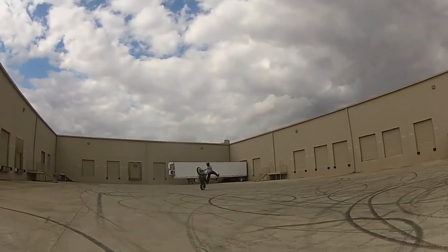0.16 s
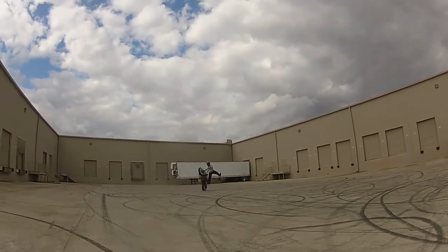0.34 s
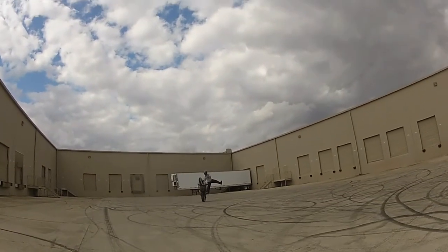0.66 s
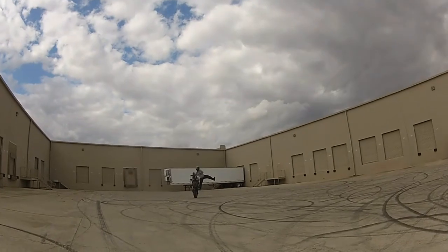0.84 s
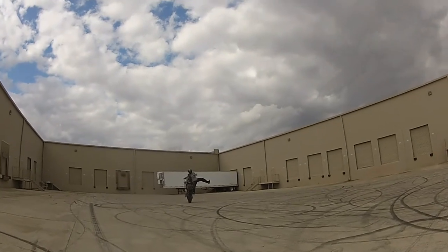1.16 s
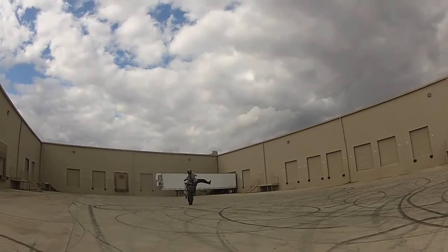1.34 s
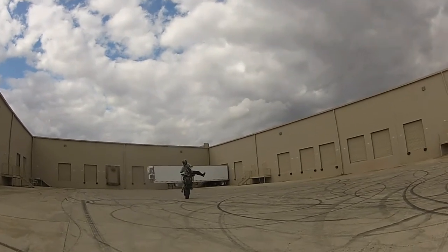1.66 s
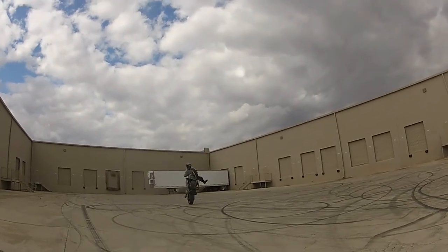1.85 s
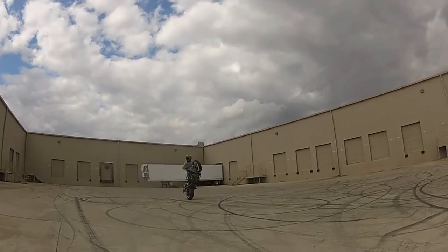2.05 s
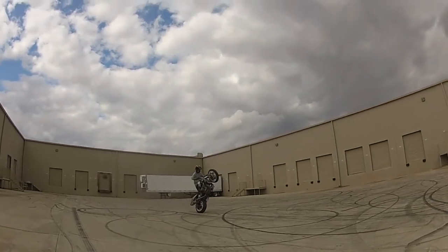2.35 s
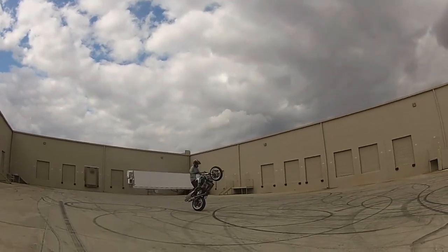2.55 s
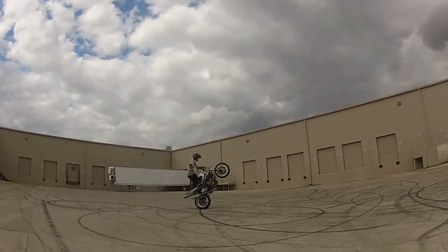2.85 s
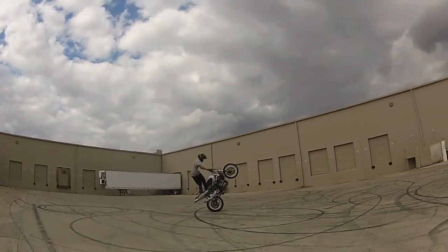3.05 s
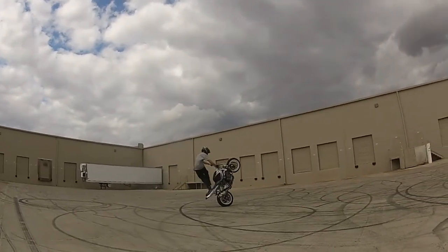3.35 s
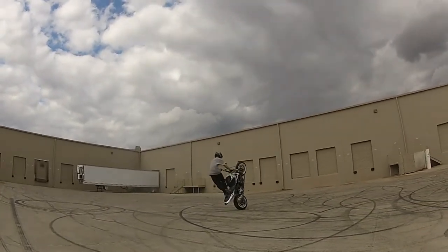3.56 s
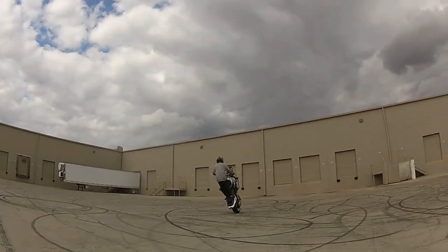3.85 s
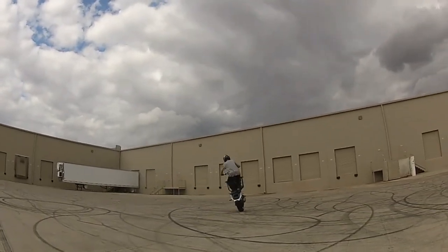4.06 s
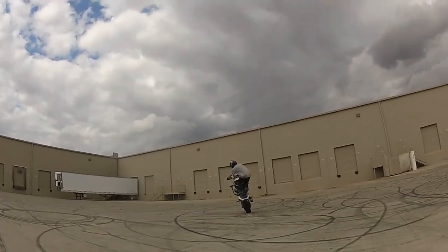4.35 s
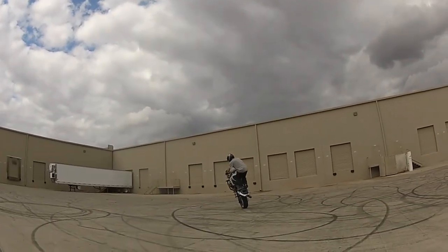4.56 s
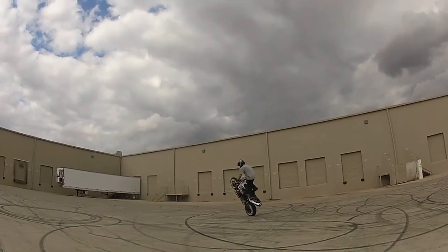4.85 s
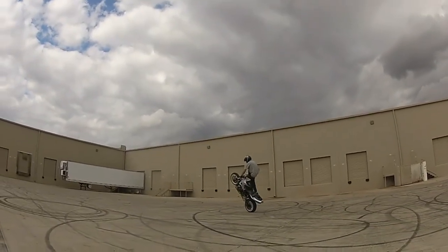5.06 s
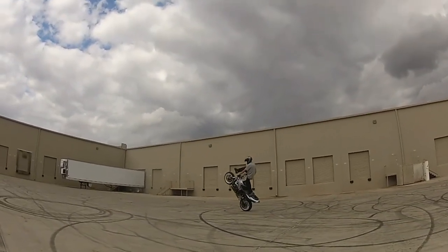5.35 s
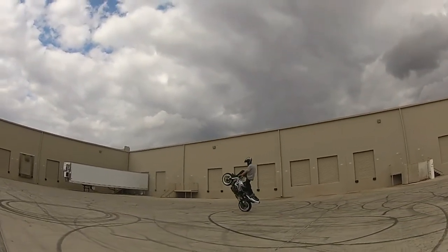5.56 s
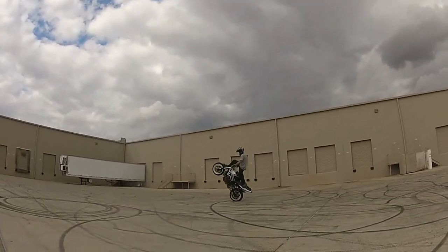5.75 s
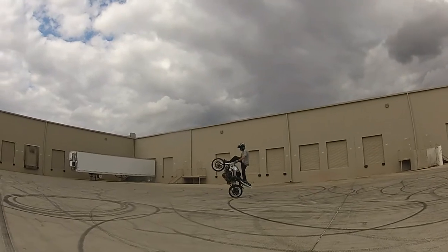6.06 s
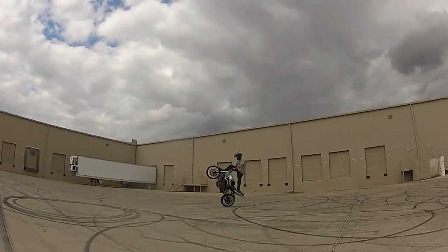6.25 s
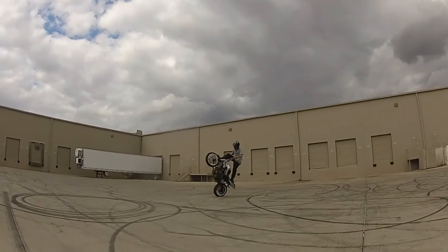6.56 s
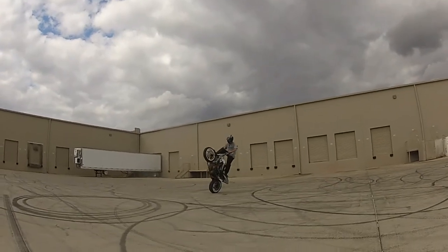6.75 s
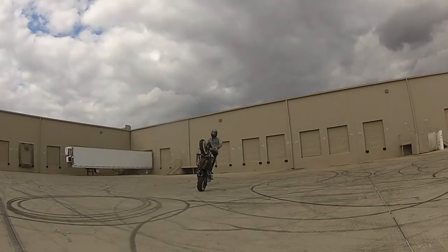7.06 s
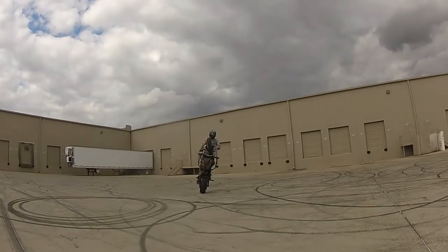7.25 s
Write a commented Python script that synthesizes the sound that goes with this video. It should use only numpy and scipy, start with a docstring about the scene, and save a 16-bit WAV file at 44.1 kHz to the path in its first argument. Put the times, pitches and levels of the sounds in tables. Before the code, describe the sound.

A single-cylinder motorcycle runs throughout, a fast, deep exhaust thumping that rises and falls with the throttle and echoes off the walls of a loading yard. The revs dip at about 0.3 seconds, then climb and waver, peaking near 1.2 and 2.2 seconds. They sag with a stumble at 2.5, and a harder bang follows at 2.8. The engine is fullest and boomiest from about 3 to 4 seconds, with a faint fizz on the hardest thumps. After its highest revs at 4.2 it falls to a slow chug by 4.5. Shorter blips peak around 5.1, 5.7, 6.4 and 6.9 seconds, and it is rising again at the end, near 7.4. Underneath are engine clatter, light chain rattle and gear whine; the rattle and whine fade around 4.2 as the bike turns away, then return. Small metallic clacks come mostly late, clearest at 6.1 and 6.9.

```python
"""Fast exhaust thumps, rising and falling, echo round a walled loading yard: a single-cylinder motorcycle
circles on its back wheel, held up by blips of throttle. Each firing rings the pipe and thumps through the
silencer, and the warehouse walls throw it back. Gears whine, the chain rattles and the drive clacks.
The microphone is a small camera's, in the yard, with the bike nearing and turning away. The camera
overloads on the hardest thumps and adds a thin metallic fizz to the bass."""
import sys
import numpy as np
from scipy import signal
from scipy.fft import rfft, irfft, next_fast_len
from scipy.io import wavfile
from scipy.ndimage import uniform_filter1d

SR = 44100
rng = np.random.default_rng(int(sys.argv[2]) if len(sys.argv) > 2 else 0)


def generate_wav(signal):
    """Clip the signal to [-1, 1] and save it as 16-bit WAV at the path in sys.argv[1]."""
    frames = np.transpose(np.atleast_2d(signal))
    scaled = np.clip(frames, -1, 1) * 32767
    pcm = np.round(scaled).astype(np.int16)
    wavfile.write(sys.argv[1], SR, pcm)


N = 326340
T = np.arange(N) / SR


def amp(db):
    """Decibels to gain."""
    return 10 ** (np.asarray(db) / 20)


def unit(x):
    """Scales to rms 1."""
    return x / np.sqrt(np.mean(x ** 2) + 1e-20)


def curve(rows, column=1):
    """One column of a time table, at every sample."""
    rows = np.asarray(rows)
    return np.interp(T, rows[:, 0], rows[:, column])


def spectrum_at(points, hz):
    """Reads a spectrum table on a log-frequency axis."""
    freq_hz, value = np.transpose(points)
    return np.interp(np.log(hz + 1), np.log(freq_hz + 1), value)


def resonance(hz, centre_hz, width_hz):
    """A peak of height 1, width_hz wide at half height."""
    return 1 / (1 + (2 * (hz - centre_hz) / width_hz) ** 2)


def shaped(x, gain):
    """Filters x by a function of frequency, without delay."""
    size = next_fast_len(len(x) + 8192)
    return irfft(rfft(x, size) * gain(np.fft.rfftfreq(size, 1 / SR)), size)[:len(x)]


def noise(colour, size=N):
    """Noise of rms 1 with the given spectrum."""
    return unit(shaped(rng.standard_normal(size), lambda hz: amp(spectrum_at(colour, hz))))


def wander(rate_hz, size=16384):
    """Smooth random drift of rms 1, up to about rate_hz."""
    hz = np.fft.rfftfreq(size, T[-1] / size)
    slow = irfft(rfft(rng.standard_normal(size)) * np.exp(-(hz / rate_hz) ** 2))
    return unit(np.interp(T, np.linspace(0, T[-1], size), slow))


def steady(x, size=4001):
    """Holds the running rms at 1."""
    window = signal.windows.hann(size)
    power = signal.fftconvolve(x ** 2, window, "same") / signal.fftconvolve(np.ones(N), window, "same")
    return x / np.sqrt(abs(power) + 1e-12)


def minimum_phase(gain, size=4096):
    """The ringing, with a sharp start, that has this spectrum."""
    cepstrum = irfft(np.log(np.maximum(gain, 1e-5)))
    half = len(cepstrum) // 2
    cepstrum[1:half] *= 2
    cepstrum[half + 1:] = 0
    return irfft(np.exp(rfft(cepstrum)))[:size]


# Engine speed as the rider blips the throttle: time_s, firing_hz
ENGINE_SPEED = [(0.0, 77.1), (0.22, 55.9), (0.33, 53.7), (0.43, 59.7), (0.89, 75.8), (1.17, 83.8),
                (1.36, 71.2), (1.44, 69.0), (1.61, 79.9), (1.75, 80.4), (1.89, 74.3), (2.18, 86.2),
                (2.55, 51.5), (2.68, 60.4), (2.92, 73.9), (3.07, 81.9), (3.15, 83.0), (3.36, 73.0),
                (3.48, 78.3), (3.77, 81.4), (3.9, 86.2), (4.16, 89.5), (4.22, 86.7), (4.29, 77.9),
                (4.51, 43.8), (4.61, 50.9), (4.8, 50.7), (4.9, 59.0), (5.11, 65.2), (5.15, 63.5),
                (5.4, 44.9), (5.56, 59.1), (5.71, 63.6), (5.85, 52.6), (6.37, 76.9), (6.45, 80.7),
                (6.51, 75.9), (6.72, 52.3), (6.86, 62.7), (6.94, 66.7), (7.05, 61.2), (7.23, 59.8),
                (7.34, 65.4), (7.4, 67.7)]


def revs(power, cruise_hz=70.7):
    """Gain that grows as a power of engine speed, 1 at cruise_hz."""
    return (curve(ENGINE_SPEED) / cruise_hz) ** power


def overrun(coast_hz_per_s=80, ease_s=0.048):
    """How far the throttle is shut: 0 while the engine pulls, 1 while it coasts down."""
    slowing = -np.gradient(curve(ENGINE_SPEED)) * SR
    return uniform_filter1d(np.clip(slowing / coast_hz_per_s, 0, 1), int(ease_s * SR) + 1)


# Chain and gears at the microphone, loud side-on and hidden from behind: time_s, gain_db
DRIVE_FACING = [(0, -3.5), (1.2, -1.5), (2.1, 2.5), (3.3, 4.5), (4.25, -11), (5, -1), (5.9, 0), (6.5, 3.5),
                (7.4, 6)]
# Tones of the gear teeth: firing_multiple, gain_db
GEAR_TEETH = [(16, -4), (22, -2), (39, -12), (42, -4), (44, 0.5), (46, -9), (49, -11), (66, -6)]
# Resonances of the casing: pitch_hz, width_hz, gain_db
CASING_MODES = [(1320, 300, -6.5), (1720, 360, -1), (2976, 210, 4), (3380, 160, -5), (3550, 680, 1.5)]


def gears(turns, whine_db=-62, lash_hz=2.3, scrape_db=3, mesh_db=-2, overrun_db=4.0):
    """Teeth mesh and scrape, ringing the casing; backlash blurs their tones, a shut throttle lifts them."""
    mesh = np.zeros(N)
    for multiple, db in GEAR_TEETH:
        blur = wander(multiple * lash_hz) + 1j * wander(multiple * lash_hz)
        mesh += amp(db + 2 * wander(6)) * (blur * np.exp(2j * np.pi * multiple * turns)).real
    mesh *= amp(mesh_db + overrun_db * overrun())
    scrape = amp(scrape_db) * noise([(1000, -25.5), (2500, -4), (3000, 3.5), (4000, -3), (6000, -27.0)])
    ringing = shaped(mesh + scrape,
                     lambda hz: sum(amp(db) * resonance(hz, f, width) for f, width, db in CASING_MODES))
    return ringing * revs(1.6) * amp(0.76 * curve(DRIVE_FACING) + whine_db)


# Engine clatter: freq_hz, gain_db
CLATTER_COLOUR = [(200, -14.5), (600, 3), (900, 2.5), (1150, -2), (1650, -3.5), (2200, -1), (2600, -11),
                  (3500, -10.5), (4500, -20), (6000, -21.5)]
# Chain and valve rattle: freq_hz, gain_db
CHAIN_COLOUR = [(1500, -22.5), (2600, -9), (3050, -10), (3600, -1.5), (3900, 1), (4500, 2.5), (5200, 0.5),
                (6000, -5)]


def clatter_and_chain(turns, clatter_db=-43, chain_db=-55, throb=0.057, grain=0.25):
    """Clatter throbs with the crank; the grainy rattle of chain and valves grows with speed."""
    crank = 1 + throb * np.cos(4 * np.pi * turns)
    facing_db = curve(DRIVE_FACING)
    clatter = unit(noise(CLATTER_COLOUR) * crank * np.exp(0.11 * wander(150)))
    chain = unit(noise(CHAIN_COLOUR) * crank * np.exp(grain * wander(300)))
    return clatter * amp(0.17 * facing_db + clatter_db) + chain * revs(1.4) * amp(facing_db + chain_db)


# Knocks from the drive: start_s, gain_db, t60_s
CLACKS = [(2.681, -33, .03), (4.848, -33, .035), (5.679, -32, .03), (6.117, -26, .028), (6.764, -30, .028),
          (6.899, -22, .016), (7.094, -36, .02), (7.259, -34, .025)]
# Spectrum of one knock: freq_hz, gain_db
CLACK_COLOUR = [(600, -12), (1500, 0), (2300, 5), (3000, 1), (4500, -2), (6000, -4)]


def drive_clacks(clack_db=-7, size=6000):
    """The drive takes up its slack with short metallic knocks."""
    out, t = np.zeros(N + size), np.arange(size) / SR
    for start_s, db, t60_s in CLACKS:
        start = round(start_s * SR)
        decay = np.exp(-np.log(1000) * t / t60_s)
        out[start:start + size] += amp(db + clack_db) * noise(CLACK_COLOUR, size) * decay
    return out[:N]


# Hard walls round the microphone, shortest path first: delay_s, gain_db
WALLS = [(0.045, -8.5), (.064, -17.5), (0.112, -20.5), (.19, -8), (.225, -9.5), (.33, -6)]
# Ring of the yard: freq_hz, t60_s
YARD_DECAY = [(60, 2.05), (400, 0.9), (2000, 1.97), (6000, 0.34)]


def yard(x, drift_s=0.003, scatter_db=-4, build_s=0.021, taps_per_s=2000):
    """Slaps from the walls, whose paths drift as the bike circles, and a scattered tail."""
    # abs() and the reflected padding leave the yard already ringing at the start.
    slaps = sum(amp(db) * np.interp(abs(T - delay - drift_s * wander(.4)), T, x) for delay, db in WALLS)
    running = np.pad(x, (SR, 0), "reflect")
    taps = rng.standard_normal(SR) * (rng.random(SR) < taps_per_s / SR)
    hz, t, bands = signal.stft(taps, SR, nperseg=256)
    fall_db = -60 * t / spectrum_at(YARD_DECAY, hz)[:, None]
    tail = signal.istft(bands * amp(fall_db) * (1 - np.exp(-t / build_s)), SR, nperseg=256)[1]
    return slaps + amp(scatter_db) * signal.fftconvolve(running, tail / np.linalg.norm(tail))[SR:SR + N]


# Exhaust reaching the walls: time_s, gain_db
TO_WALLS = [(0, -20.5), (1.3, -20.5), (2.3, -19.5), (3.5, -19.5), (5.5, -22.5), (6.5, -18), (7.4, -18.5)]
# Colour of what returns to the microphone: freq_hz, gain_db
YARD_COLOUR = [(50, -5), (90, -1), (135, 2.5), (250, -0.5), (330, 0), (400, -4), (500, 0.5), (700, 8.5),
               (1000, 16)]


def wall_echoes(pipe, wall_db=-1.5):
    """The exhaust coming back from across the yard, louder with engine speed."""
    returned = yard(steady(pipe) * revs(0.54) * amp(curve(TO_WALLS)))
    return amp(wall_db) * shaped(returned, lambda hz: amp(spectrum_at(YARD_COLOUR, hz)))


def raggedness(open_spread=0.16, shut_spread=0.27):
    """The burn is ragged on a shut throttle and evens out with speed."""
    return (open_spread + (shut_spread - open_spread) * overrun()) / revs(0.21)


def firings(turns, jitter_s=0.00075):
    """One kick per engine cycle; the worse the burn, the more kicks fall short or come early or late."""
    due = np.flatnonzero(np.diff(np.floor(turns)))
    shortfall, lateness = rng.standard_normal((len(due), 2)).T * raggedness()[due]
    fired = due + np.round(lateness * jitter_s * SR).astype(int)
    kicks = np.zeros(N)
    kicks[np.clip(fired, 0, N - 1)] = np.exp(-2 * abs(shortfall))
    return kicks


# One puff out of the silencer: freq_hz, gain_db
SILENCER = [(15, -44), (35, -34.5), (50, 1), (80, -3), (190, -9), (330, -5.5), (400, -8.5), (450, -14),
            (700, -24), (800, -35.5), (1000, -56.5), (1600, -56), (5000, -73)]
# Standing waves of the pipe: pitch_hz, width_hz, lift_db
PIPE_MODES = [(69.4, 71, -2.5), (133.9, 76.4, 13), (263.6, 47, 8), (365.9, 49, 9.5), (582, 76, 3)]


def exhaust(turns, turbulence=0.049, puff_cycles=0.53):
    """Each kick and its puff of gas ring the pipe and are muffled by the silencer."""
    hz = np.fft.rfftfreq(16384, 1 / SR)
    modes_db = sum(db * resonance(hz, f, width) for f, width, db in PIPE_MODES)
    ring = minimum_phase(amp(spectrum_at(SILENCER, hz) + modes_db))
    gas = noise([(100, 8), (200, 2), (350, -3.5), (600, 4), (1000, -0.5), (3000, -2.0)])
    puffs = np.exp(-(turns % 1) / puff_cycles) * gas
    return signal.oaconvolve(firings(turns) + turbulence * raggedness() * puffs, ring)[:N]


# Odd firings, stumbles under 1 and bangs over 1: centre_s, length_s, strength_factor
ODD_FIRINGS = [(2.1, .02, .4), (2.55, .05, .7), (2.798, .036, 1.7), (2.922, .026, 1.12), (5.225, .04, .4),
               (6.81, .03, .6)]


def stumbles_and_bangs():
    """Gain on the direct exhaust where the engine falters or fires hard."""
    return 1 + sum((factor - 1) * np.exp(-(2 * (T - centre_s) / length_s) ** 4)
                   for centre_s, length_s, factor in ODD_FIRINGS)


# Upper edges of the exhaust's bands, with rasp above the last: throb_hz, boom_hz, bark_hz
BAND_EDGES = (83, 184, 353)
# Exhaust bass at the microphone: time_s, throb_db, boom_db
BASS = [(0, -24, -31), (.6, -31, -23.5), (1.2, -23.5, -30), (2.1, -27.5, -22), (2.8, -24.5, -17.5),
        (3.5, -24.5, -14), (4.15, -27.5, -19.5), (4.7, -21, -22.5), (5.15, -23.5, -15.5), (5.5, -23.5, -22),
        (6.2, -25.5, -19.5), (6.7, -21, -25.5), (7.4, -18, -22)]
# Bark and rasp as the bike nears the microphone and the pipe swings round: time_s, gain_db
PIPE_FACING = [(0, -18.5), (.35, -30), (.8, -21), (1.9, -21.5), (2.55, -16), (2.95, -15.5), (3.6, -16.5),
               (4.1, -16.5), (4.6, -18.5), (5.1, -16.5), (5.45, -19.5), (6.3, -18.5), (6.65, -20),
               (7.4, -16.5)]


def direct_exhaust(pipe, throb_db=-2.5, boom_db=-1, bark_db=0.7, rasp_db=-1.5, swell_db=7):
    """Straight from pipe to microphone: low throb and boom, then bark and rasp with speed and heading."""
    lows, bass, body = (shaped(pipe, lambda hz: 1 / (1 + (hz / edge) ** 12)) for edge in BAND_EDGES)
    throb = steady(lows) * amp(curve(BASS) + throb_db)
    # The boom swells as the second harmonic crosses the pipe's resonance.
    in_tune = resonance(2 * curve(ENGINE_SPEED), centre_hz=136.3, width_hz=16)
    boom = steady(bass - lows) * amp(curve(BASS, column=2) + swell_db * in_tune + boom_db)
    rasp = (pipe - body) * amp(rasp_db) * revs(1.83)
    bark = steady(body - bass + rasp) * revs(1.75) * amp(curve(PIPE_FACING) + bark_db)
    return throb + boom + bark


def scene():
    """The bike and the yard at one microphone; exhaust, clatter and gears follow the one crankshaft."""
    turns = np.cumsum(curve(ENGINE_SPEED)) / SR  # engine cycles, one firing each
    pipe = exhaust(turns)
    thumps = direct_exhaust(pipe) * stumbles_and_bangs()
    return (thumps + wall_echoes(pipe) + clatter_and_chain(turns) + gears(turns) + drive_clacks())[None]


def record(dry, corner_hz=5450, hold_hz=12000, edge_hz=15750):
    """The camera overloads; its slow converter holds each sample, mirroring the sound about hold_hz."""
    overloaded = np.clip(dry[0], -1, 1)
    dulled = shaped(overloaded, lambda hz: 1 / np.sqrt(1 + (hz / corner_hz) ** 44))
    mirrored = dulled * (1 + 2 * np.cos(2 * np.pi * hold_hz * T))
    held = shaped(mirrored, lambda hz: np.sinc(hz / hold_hz))
    top_cut = signal.firwin(511, edge_hz, window=("kaiser", 9), fs=SR)
    return signal.oaconvolve(held, top_cut, "same")[None]


dry = scene()
out = record(dry)
generate_wav(out)
```